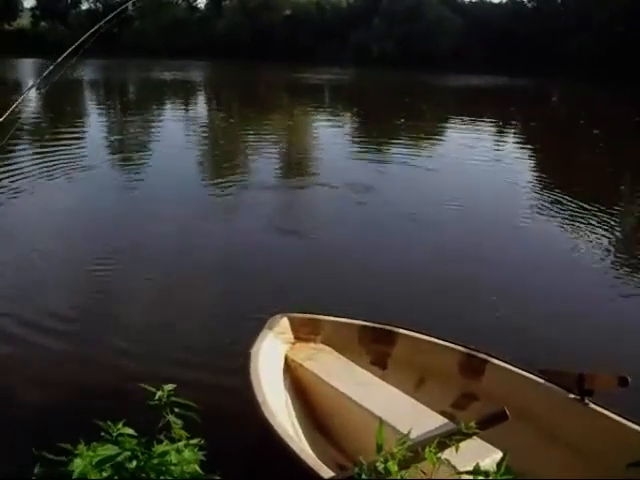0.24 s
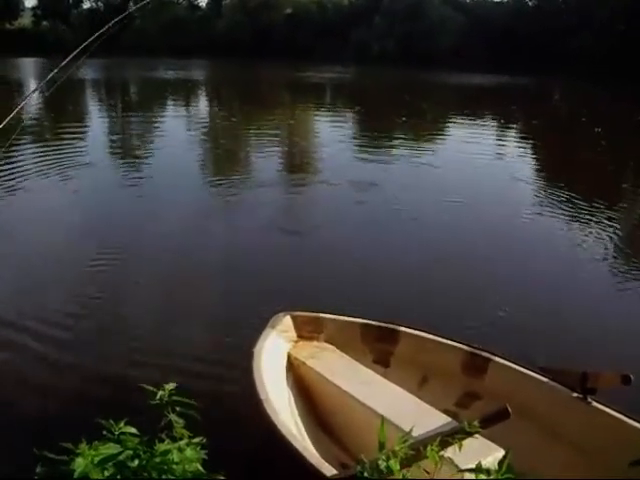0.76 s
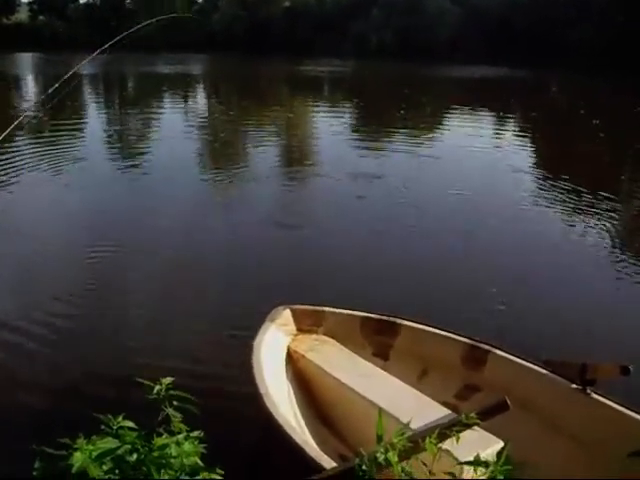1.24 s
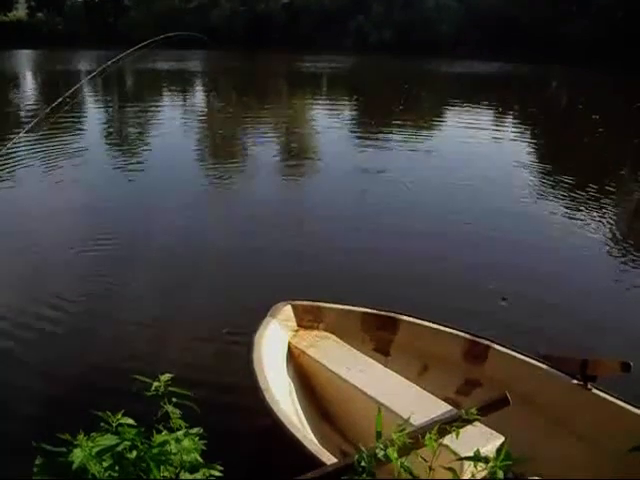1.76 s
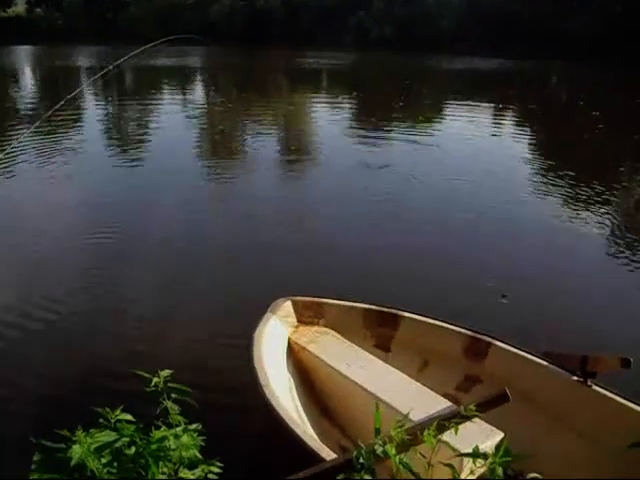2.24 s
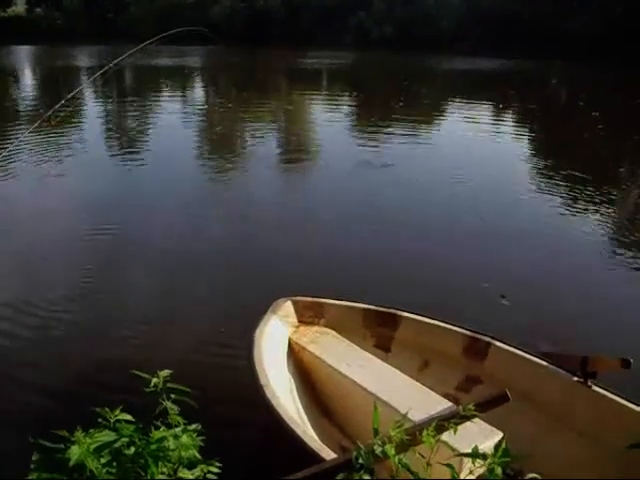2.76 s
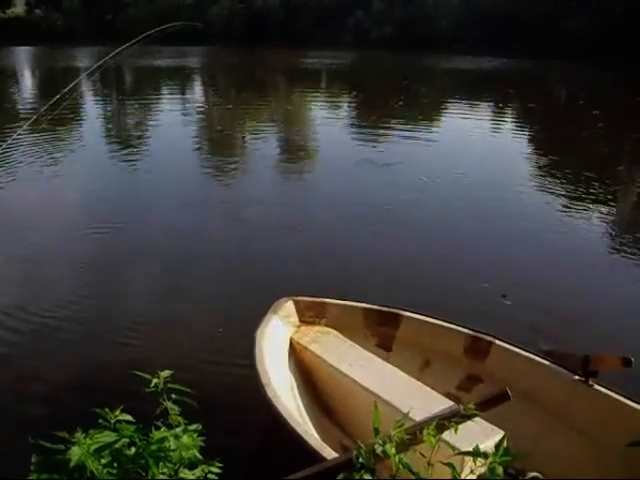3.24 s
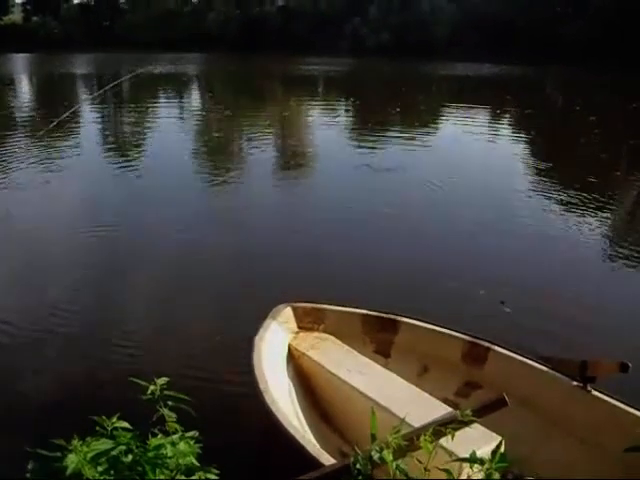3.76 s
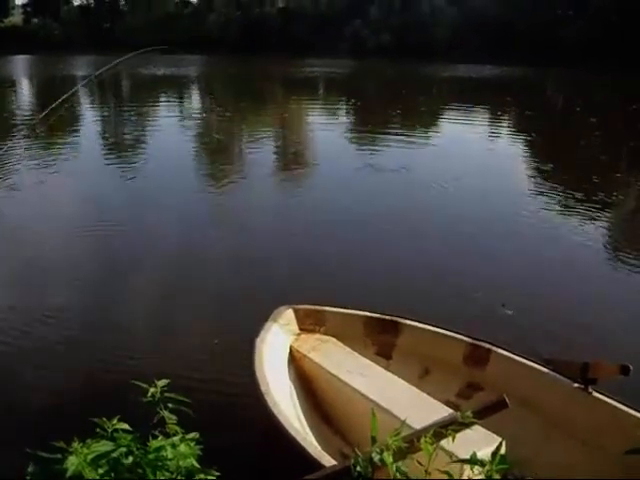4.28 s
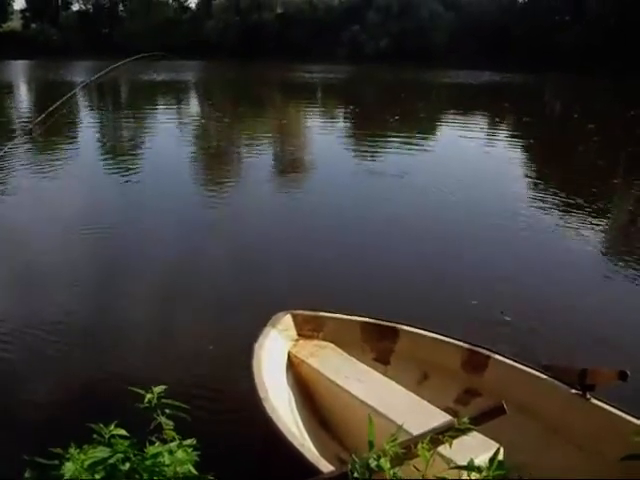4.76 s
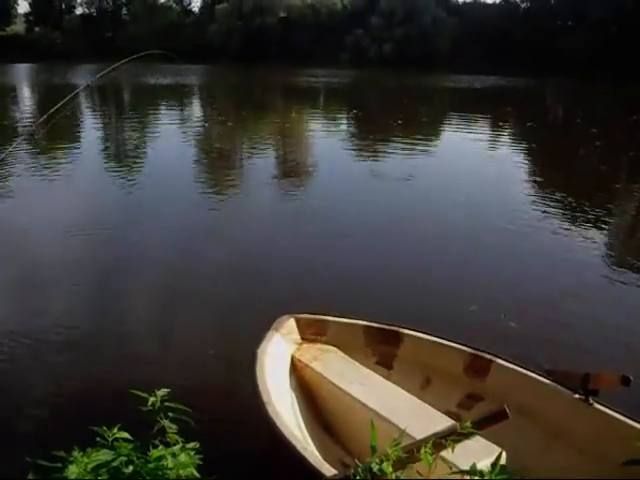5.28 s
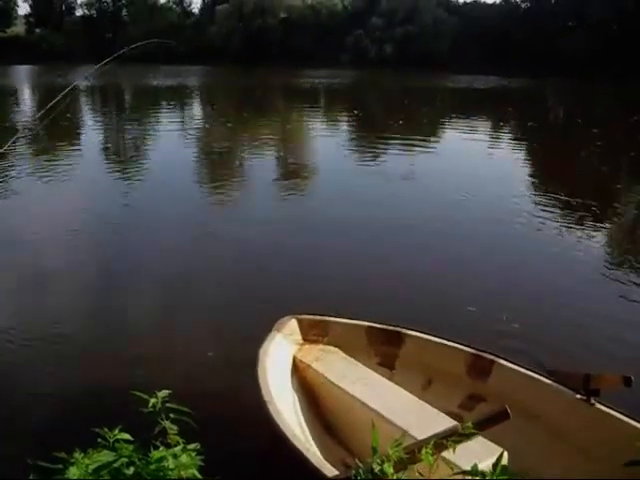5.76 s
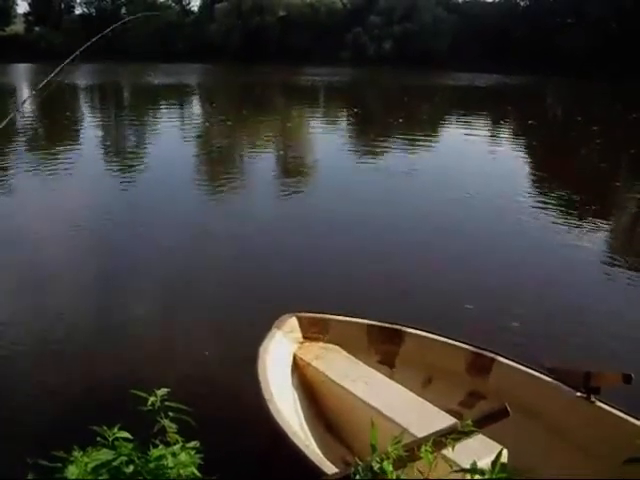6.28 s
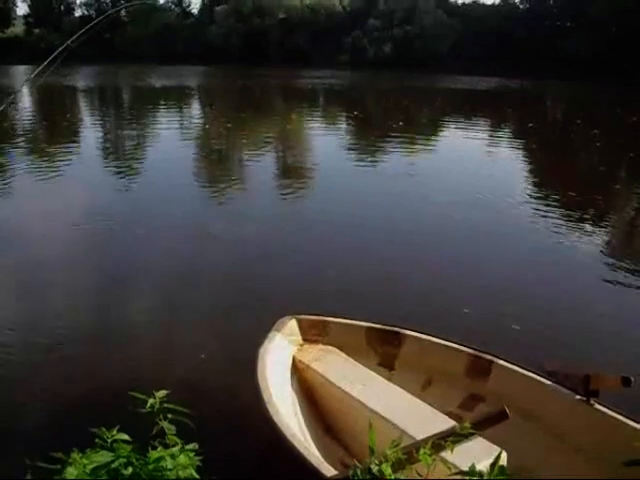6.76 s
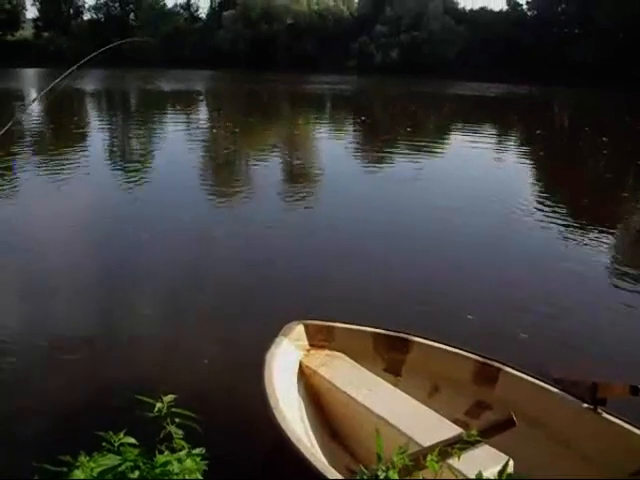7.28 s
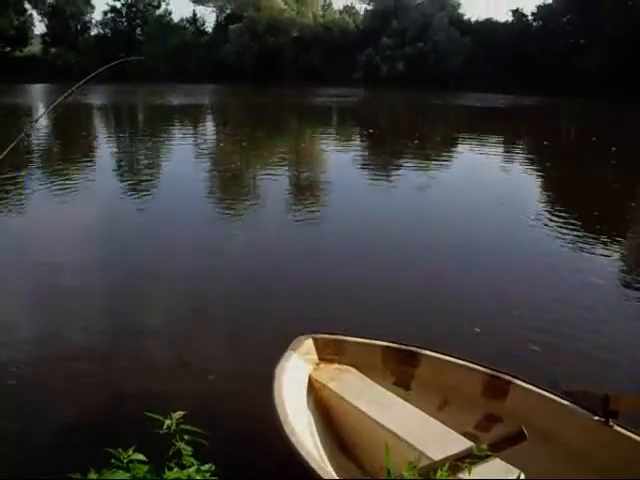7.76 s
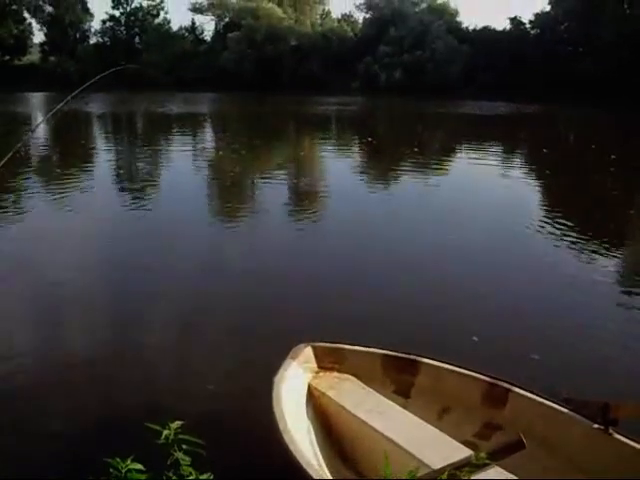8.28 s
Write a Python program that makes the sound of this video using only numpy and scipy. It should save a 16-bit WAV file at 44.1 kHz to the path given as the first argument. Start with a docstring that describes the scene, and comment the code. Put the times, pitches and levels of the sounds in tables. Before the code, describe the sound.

A fishing reel's drag ticks singly, then buzzes in fast metallic bursts as a hooked fish runs, over soft low wind rumble on a riverbank.

```python
"""On a quiet riverbank a hooked fish takes line from a spinning reel, heard close by in mono.
The drag ticks, then buzzes in runs: a pawl snaps over the 23 teeth of the turning spool,
whose ringing modes beam sound in lobes that turn with it. Faint creaks, knocks and rattles join in.
Two short echoes, a scattered tail, a bright haze and one later echo answer the clicks;
filtered noise makes the soft rumble of open air underneath."""
import sys
import numpy as np
from scipy import signal
from scipy.fft import rfft, irfft
from scipy.io import wavfile

SR = 44100
rng = np.random.default_rng(int(sys.argv[2]) if len(sys.argv) > 2 else 0)


def pcm_store(signal):
    """Save signal as 16-bit PCM."""
    levels = np.round(np.clip(np.atleast_2d(signal), -1, 1) * 32767)
    wavfile.write(sys.argv[1], SR, levels.astype(np.int16).T)


N = 376173

TEETH = 23  # teeth per turn of the spool
# Strain that makes the tackle chatter and creak. Each row: time in seconds, level in dB before the envelope.
CHATTER_LEVEL = [(0, -50), (1.0, -42), (1.5, -40), (2.2, -40.5), (2.9, -46.5), (3.6, -37), (8.5, -65)]


def from_db(db):
    """Decibels to gain."""
    return 10 ** (np.asarray(db) / 20)


def rms_one(x):
    """Scale to rms 1."""
    return x / np.sqrt(np.mean(x ** 2) + 1e-20)


def band(x, low_hz, high_hz):
    """Gentle causal band-pass."""
    edges_hz = np.clip([low_hz, high_hz], 10, .48 * SR)
    return signal.sosfilt(signal.butter(2, edges_hz, "band", fs=SR, output="sos"), x + 1e-18)


def dying(t, t60):
    """Envelope that loses 60 dB in t60 seconds."""
    return np.exp(-np.log(1000) * t / t60)


def place(times, sounds):
    """Lay each short sound down at its time in seconds."""
    out = np.zeros(N + SR)
    starts = np.round(np.asarray(times) * SR).astype(int)
    for start, sound in zip(starts, sounds):
        out[start:start + len(sound)] += sound
    return out[:N]


def run_teeth(speed):
    """The spool turns at the given speed; a click falls each time a whole tooth has passed."""
    s, teeth_per_s = np.transpose(speed)
    t = np.arange(s[0], s[-1], 1 / SR)
    passed = np.cumsum(np.interp(t, s, teeth_per_s)) / SR
    whole_teeth = np.arange(np.ceil(passed[-1]))
    return np.interp(whole_teeth, passed, t)


def tooth_times():
    """Number, time and strength (dB) of every tooth that passes the pawl, in single ticks and in runs."""
    # The fish tugs and the spool slips by a single tooth. Each row: time in seconds, strength in dB.
    single_ticks = [(0.1335, -1.5), (0.4742, -2), (0.6972, -1), (0.8272, -0.5), (0.9353, -0.5),
                    (1.027, -1.5), (1.1094, -1), (2.8405, 0.5), (2.9633, 0.5), (3.1136, 1.5), (3.2465, 2),
                    (3.343, 1.5), (3.4469, -0.5), (5.6259, 0), (5.7166, 0), (5.831, 0.5), (5.9461, 2),
                    (6.0982, 1.5), (6.3185, 1.5), (6.6249, 2.0), (6.8888, 0.5), (6.9913, 1), (7.0704, 1),
                    (7.1302, 1.5)]
    # Spool speed as the fish pulls steadily, dashes off, tires so that the spool runs down,
    # and makes a second run. Each row of these four: time in seconds, speed in teeth per second.
    steady_pull = [(1.1712, 16.67), (1.3396, 17.62), (1.3761, 20.38), (1.6558, 19.51), (1.7024, 18.24),
                   (1.9408, 20.26), (1.9893, 17.42), (2.4144, 19.65), (2.4809, 17.38), (2.5087, 20.29),
                   (2.759, 11.34)]
    dash = [(3.5168, 25.27), (3.6326, 28.15), (3.772, 60.5), (3.8718, 89.68), (3.9922, 101.75),
            (4.093, 134.92), (4.23, 81.69), (4.3253, 81.24), (4.3574, 73.88), (4.5503, 58.0),
            (4.6055, 59.6), (4.697, 30.33)]
    run_down = [(4.7159, 30.81), (4.8815, 32.4), (4.9007, 40.46), (5.0631, 39.09), (5.2074, 35.25),
                (5.3487, 20.32), (5.4163, 15.89), (5.5602, 15.86)]
    second_run = [(7.1937, 19.22), (7.2981, 41.31), (7.375, 45.39), (7.6, 73.04), (7.7388, 58.39),
                  (7.801, 37.33), (7.9068, 22.44), (8.0555, 39.15), (8.1088, 35.18), (8.2886, 29.81),
                  (8.3985, 42.56), (8.5108, 26.55)]
    in_runs = np.concatenate([run_teeth(speed) for speed in (steady_pull, dash, run_down, second_run)])
    ticks = [tuple(tick) for tick in single_ticks]
    run_clicks = [(at, 0) for at in in_runs]
    s, strength_db = np.transpose(sorted(ticks + run_clicks))
    return np.arange(len(s)), s, strength_db


def snaps(tooth, level_db, rim_db, scatter_db, swell_s,
          bend=0.014, pitch_scatter=0.0067, phase_scatter=1.13, size=1800):
    """One click per tooth as heard from one side: the lobes of each mode sweep past as the spool turns."""
    # Ringing modes of spool and pawl. Each row: mean frequency in Hz, t60 in seconds, relative level in dB,
    # lobes per turn, lobe depth in dB, tooth at which a lobe faces the microphone,
    # once-per-turn swing in dB, tooth that sets the phase of that swing.
    reel_modes = [(1920, 0.0026, -28.5, 2.0, 2, 4.5, 1.5, 30.5),
                  (3120, 0.0062, -32.5, 2.0, 1.5, 5.8, 1, 11),
                  (4340, 0.0038, -28.5, 2.0, 2.5, 12.6, 4, 5.5),
                  (5240, 0.0047, -33.5, 2.0, 2.5, 5.1, 2, 15), (6250, 0.01, -35, 4.0, 9, 4.9, 5, 14.5),
                  (6150, 0.049, -49.5, 4, -5, 6.3, -11, -1.5), (6594, 0.031, -28.5, 2, 4.5, 10.1, 0, -6.5),
                  (6914, 0.0081, -26.5, 4.0, 3.5, 1.6, 3.5, 26.5),
                  (7580, 0.0043, -31, 2.0, 9.5, 4.6, 6, 10.5), (8000, 0.14, -65, 2, -5, 5.1, -8, -2),
                  (8730, 0.013, -33.5, 2.0, -1, 1.8, 4, 11.5), (9720, 0.0095, -29.5, 2.0, 5.5, 11, 0, 10.0),
                  (9900, 0.069, -45, 2, 2, 2, -6, 6), (10170, 0.008, -23, 2.0, 7, 5.3, 9, 23),
                  (10520, 0.011, -23, 2.0, 3, 5.9, 3.5, 10),
                  (10890, 0.0069, -28.5, 2.0, 13, 4.5, 4.5, 11.5),
                  (11380, 0.0061, -36, 2.0, 8.5, 11.1, 18, 6), (12100, 0.013, -30.5, 2.0, -1, 3.3, -1, 14),
                  (12370, 0.016, -29.5, 2.0, 2, 4.7, 4, 0), (13500, 0.0042, -37, 2.0, 1.7, 4.6, 12, 9),
                  (14100, 0.0028, -30, 2.0, 4, 11, 3, 13.5)]
    rim_low_hz, rim_high_hz = 6000, 7300
    hz, t60, mode_db, lobes, lobe_db, lobe_tooth, swing_db, swing_tooth = np.transpose(reel_modes)
    on_rim = (hz > rim_low_hz) & (hz < rim_high_hz)
    chance = rng.standard_normal((len(tooth), 3, len(hz)))

    def angle(facing):
        """Spool angle in radians, one row per tooth, from the tooth that faces."""
        return 2 * np.pi * (tooth[:, None] - facing) / TEETH

    lobe_beam_db = lobe_db * np.cos(np.round(lobes) * angle(lobe_tooth))
    beam_db = lobe_beam_db + swing_db * np.cos(angle(swing_tooth))
    click_db = level_db[:, None] + rim_db[:, None] * on_rim
    strength = from_db(click_db + mode_db + beam_db + scatter_db * chance[:, 0])
    # the spool is not quite even: once a turn its rim modes rise in pitch while the others fall
    uneven = bend * np.where(on_rim, 1, -1) * np.cos(angle(0))
    pitch = hz * (1 + uneven + pitch_scatter * chance[:, 1])
    # the pawl scrapes as it lands, so the modes come only loosely into step just after the touch
    phase = phase_scatter * chance[:, 2] - 2 * np.pi * pitch * swell_s
    t = np.arange(size) / SR
    clicks = np.zeros((len(tooth), size))
    for k in range(len(hz)):
        ringing = np.sin((2 * np.pi * pitch[:, k, None] * t + phase[:, k, None]).astype(np.float32))
        clicks += strength[:, k, None] * ringing * dying(t, t60[k])
    return clicks * (1 - np.exp(-t / 0.00014))  # soft onset


def drag(swell_s=0.000254):
    """The clicks arrive directly and by two short echo paths, each of which sees another side of the spool."""
    # Level of the rim modes as the reel turns in the hands. Each row: time in seconds, level in dB.
    rim_level = [(5.1, -1.5), (5.5, -3.5), (6.35, -0.5), (7.1, -1.5), (7.3, -7.5), (7.9, -3.5)]
    direct_db, near_echo_db = -0.5, -2.0
    # a faster spool flicks the pawl harder, and its rim rings more: gains for the reference speed
    full_teeth_per_s, fast_gain_db, fast_rim_db = 160, 1.0, 2.5
    tooth, s, strength_db = tooth_times()
    haste = 1 / (np.gradient(s) * full_teeth_per_s)
    click_db = strength_db + fast_gain_db * haste
    rim_db = np.interp(s, *np.transpose(rim_level)) + fast_rim_db * haste
    # between the runs the reel is swung round: its far echo grows, from 5.1 to 6.3 s
    far_db = np.interp(s, [5.1, 6.3], [-11.5, -4.5])
    # twice a turn a gap between the lobes points along the near path
    gap_db = -8 * np.cos(2 * np.pi * (tooth - 6.7) / TEETH) ** 10
    direct = snaps(tooth, click_db + direct_db, rim_db, scatter_db=2.5, swell_s=swell_s)
    near = snaps(tooth + 2.47, click_db + near_echo_db + gap_db, rim_db, scatter_db=4.0, swell_s=swell_s)
    far = snaps(tooth + 0.46, click_db + far_db, rim_db, scatter_db=1.5, swell_s=swell_s)
    # the hands move, so the paths are never quite the same length
    near_delay_s = .0025 + .00012 * rng.standard_normal(len(s))
    far_delay_s = .0092 + .00006 * rng.standard_normal(len(s))
    near_echo = band(place(s + near_delay_s, near), 1800, 9900)
    far_echo = band(place(s + far_delay_s, far), 1400, 16000)
    return place(s, direct) + near_echo + far_echo


def creaks(size=2500):
    """On slow teeth the pawl creaks as it rides up the next flank: a burst of noise that follows the strain."""
    share_of_gap, below_teeth_per_s = 0.42, 22
    over_chatter_db, t60_s = -2, 0.017
    _, s, _ = tooth_times()
    gap_s = np.diff(s)
    slow = gap_s * below_teeth_per_s > 1
    at = (s[:-1] + share_of_gap * gap_s)[slow]
    level = from_db(np.interp(at, *np.transpose(CHATTER_LEVEL)) + over_chatter_db)
    envelope = place(at, level[:, None] * dying(np.arange(size) / SR, t60_s))
    return envelope * rms_one(band(rng.standard_normal(N), 4060, 4400))


def knocks(size=3000):
    """Rod and line shift in the hands, and now and then something creaks: brief bursts of dying band noise."""
    # Small knocks of the tackle, with a few faint creaks at 0.649, 1.825 and 2.484 s. Each row: start in
    # seconds, level in dB before the decay, # frequency in Hz about which the band lies, t60 in seconds.
    small_bursts = [(.337, -31, 8900, .025), (.649, -37, 4200, 0.045), (0.699, -34, 1800, 0.071),
                    (.728, -24, 3430, 0.017), (.729, -38, 8500, .015), (1.118, -35.5, 3320, 0.087),
                    (1.617, -32.5, 3400, 0.069), (1.784, -25, 4170, .02), (1.825, -36, 3400, .05),
                    (2.192, -34, 2800, 0.064), (2.328, -34, 3300, .05), (2.484, -37, 4200, .04)]
    t = np.arange(size) / SR
    starts, bursts = [], []
    for s, level_db, hz, t60 in small_bursts:
        grain = rms_one(band(rng.standard_normal(size), hz / 1.64, hz * 1.37))
        starts.append(s)
        bursts.append(from_db(level_db) * dying(t, t60) * grain)
    return place(starts, bursts)


def chatter(per_s, scatter_db, t60, size=2000):
    """The tackle chatters under strain: random touches of uneven strength open a dying band of noise."""
    s, level_db = np.transpose(CHATTER_LEVEL)
    touch_gain = from_db(scatter_db * np.clip(rng.standard_normal(N), -2, 2))
    touches = (rng.random(N) < per_s / SR) * touch_gain
    envelope = signal.fftconvolve(touches, dying(np.arange(size) / SR, t60))[:N]
    grain = rms_one(band(rng.standard_normal(N), 2100, 4400))
    strain = from_db(np.interp(np.arange(N) / SR, s, level_db))
    return strain * envelope * grain


def bank(x, close_db, close_t60, wide_db, wide_t60, echo_db, echo_s, size=8000):
    """Plants and ground scatter a short tail and a bright haze; something farther off returns one dull echo."""
    t = np.arange(size) / SR
    swell = 1 - np.exp(-(t / 0.001) ** 2)
    scatter = from_db(close_db) * rng.standard_normal(size) * dying(t, close_t60) * swell
    # the haze is noise that follows the smoothed power of the clicks
    fading = dying(t, wide_t60) ** 2
    haze_power = signal.fftconvolve(x ** 2, fading / fading.sum())[:N]
    haze_level = np.sqrt(np.abs(haze_power))
    haze = from_db(wide_db) * haze_level * rms_one(band(rng.standard_normal(N), 4100, 20000))
    samples = np.arange(N)
    echo = np.interp(samples - echo_s * SR, samples, band(x, 2250, 4500), left=0)
    return signal.fftconvolve(x, scatter)[:N] + haze + from_db(echo_db) * echo


def open_air():
    """An even rumble of light wind, noise whose spectrum thins out to a faint hiss in the treble."""
    # Spectrum of the open air. Each row: frequency in Hz, relative level in dB per Hz.
    air_spectrum = [(11, -37), (18, 2.5), (53, -1), (116, -3.5), (583, -17.5), (1970, -30.5), (2200, -30.5),
                    (3370, -34.5), (3990, -35), (4590, -37), (5760, -38), (7020, -37.5), (12000, -41),
                    (13500, -41), (15500, -44)]
    hz, density_db = np.transpose(air_spectrum)
    bins_hz = np.maximum(np.arange(N // 2 + 1) * SR / N, 1)
    colour = from_db(np.interp(np.log(bins_hz), np.log(hz), density_db))
    rumble = irfft(rfft(rng.standard_normal(N)) * colour, N)
    return from_db(-27) * rms_one(rumble)


def scene():
    """The reel close by, the bank around it, the tackle and the open air; one channel."""
    reel = from_db(1.27) * drag()
    scattered = bank(reel, close_db=-28.5, close_t60=0.048, wide_db=-14.5, wide_t60=0.36,
                     echo_db=-12.0, echo_s=.030)
    tackle = knocks() + chatter(per_s=45, scatter_db=3.0, t60=0.032)
    return (reel + scattered + tackle + open_air() + creaks())[None]


def record(dry):
    """A steep low-pass cuts the top above 15450 Hz."""
    low_pass = signal.ellip(10, .3, 70, 15450, fs=SR, output="sos")  # 0.3 dB ripple, 70 dB stop band
    return signal.sosfilt(low_pass, dry)


dry = scene()
out = record(dry)
pcm_store(out)
```